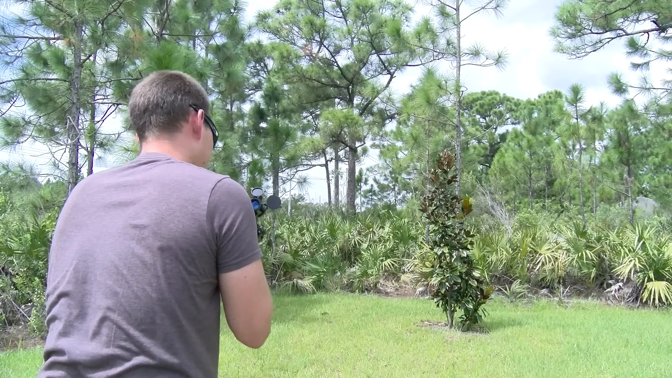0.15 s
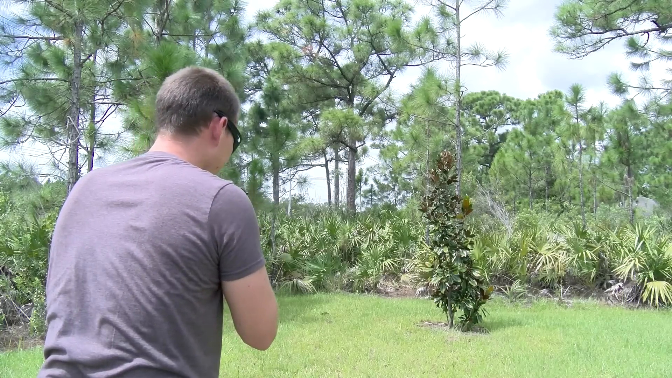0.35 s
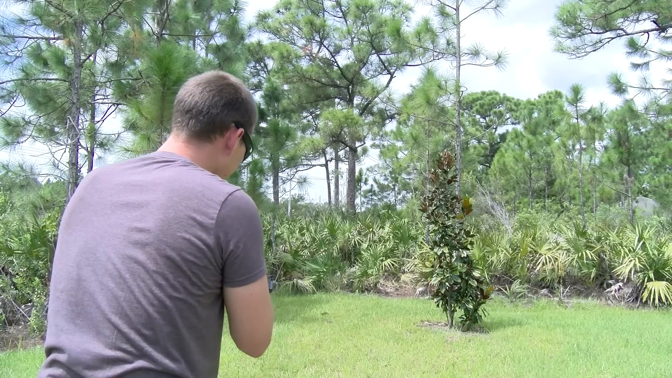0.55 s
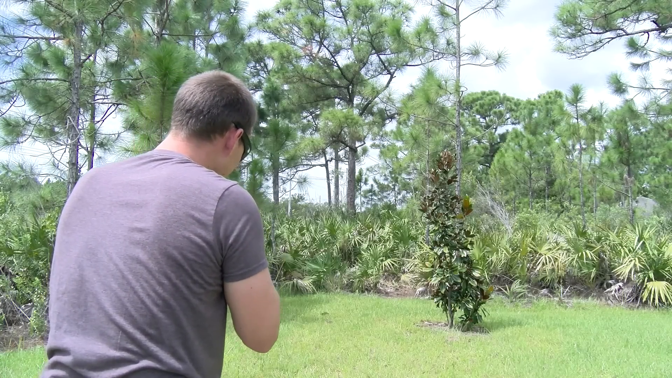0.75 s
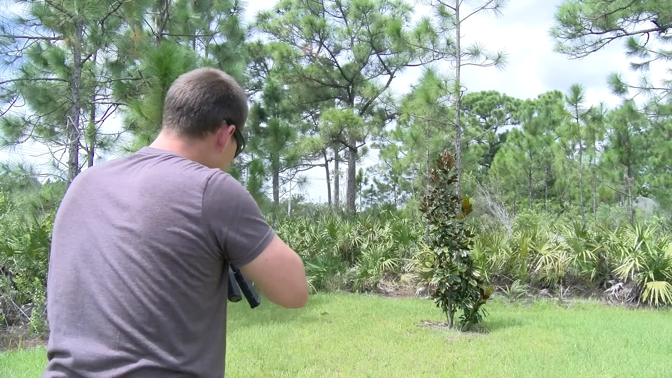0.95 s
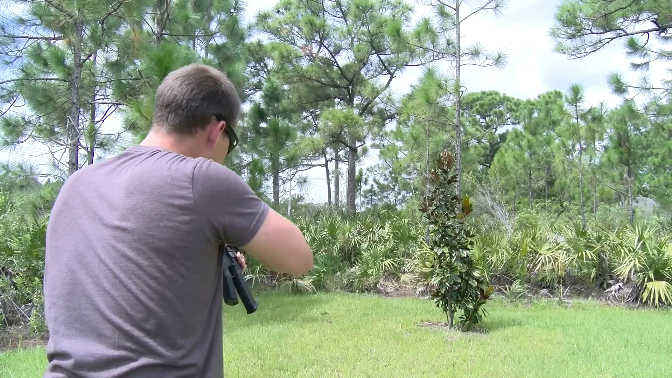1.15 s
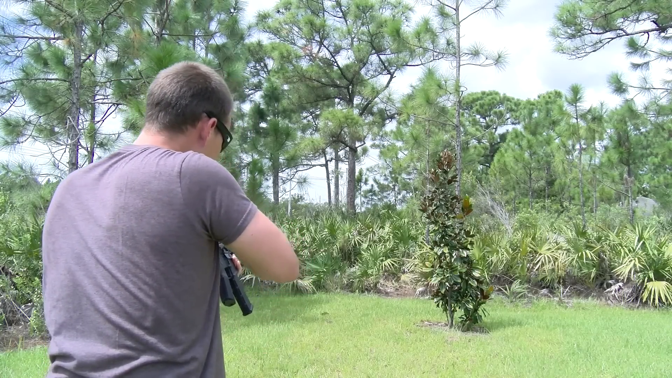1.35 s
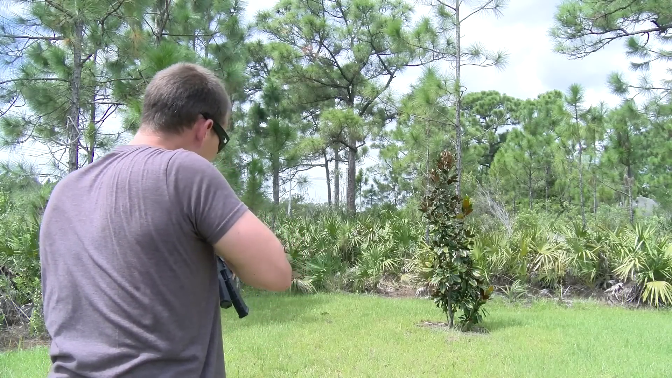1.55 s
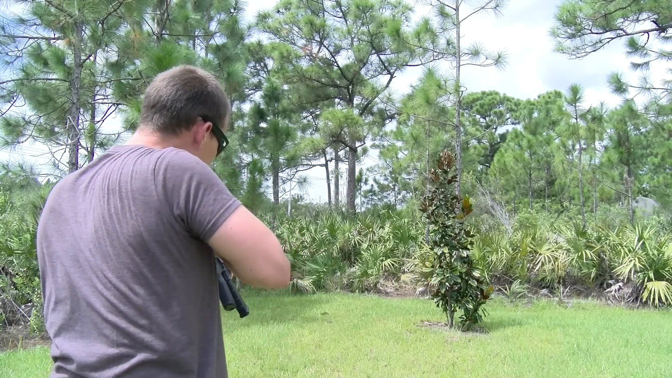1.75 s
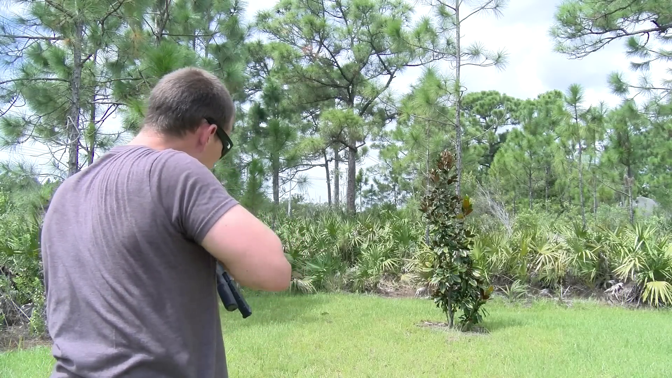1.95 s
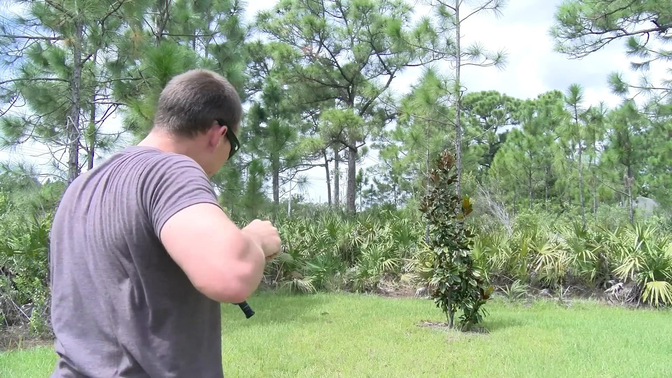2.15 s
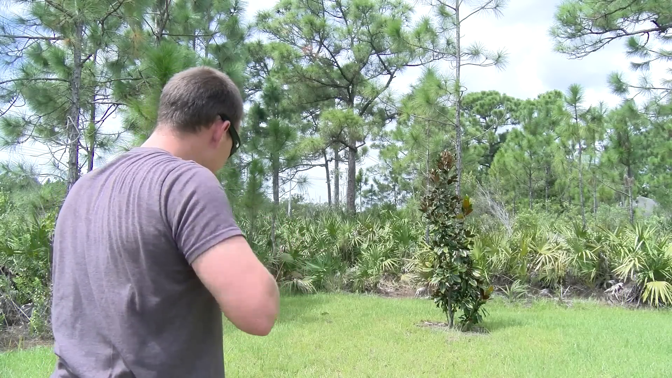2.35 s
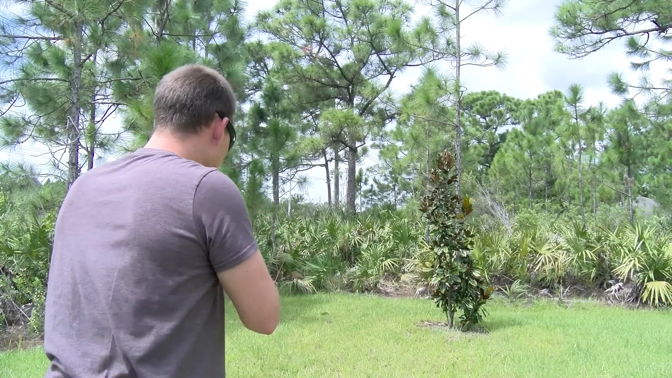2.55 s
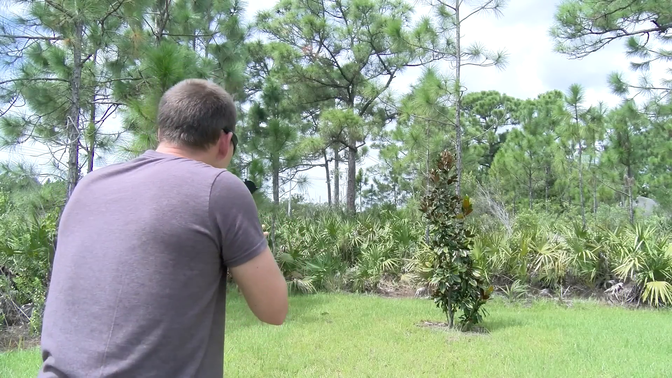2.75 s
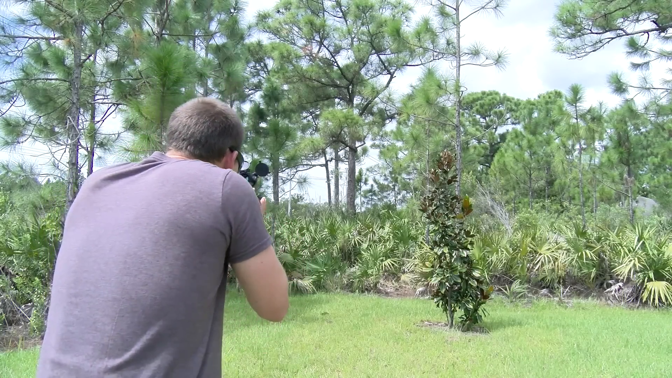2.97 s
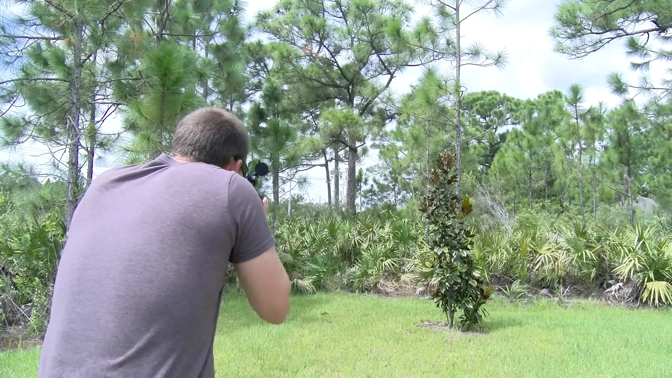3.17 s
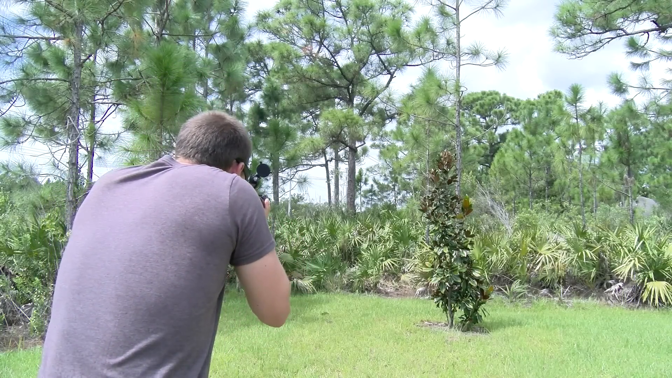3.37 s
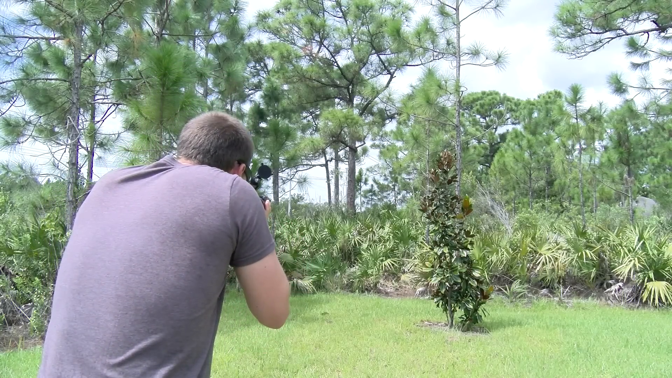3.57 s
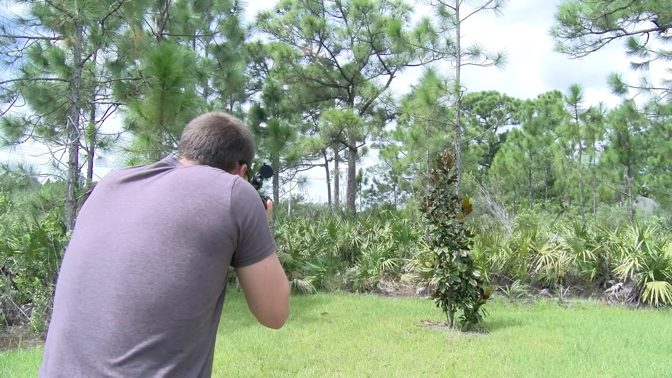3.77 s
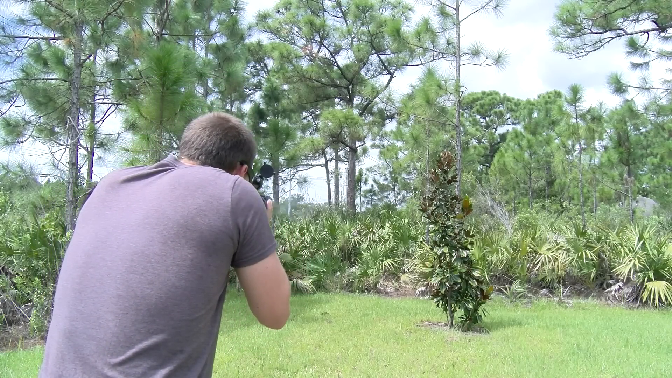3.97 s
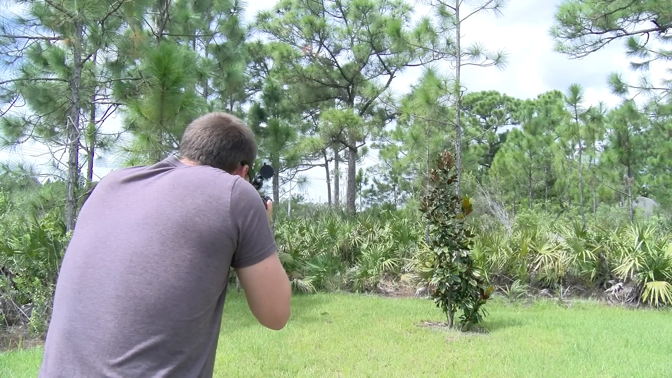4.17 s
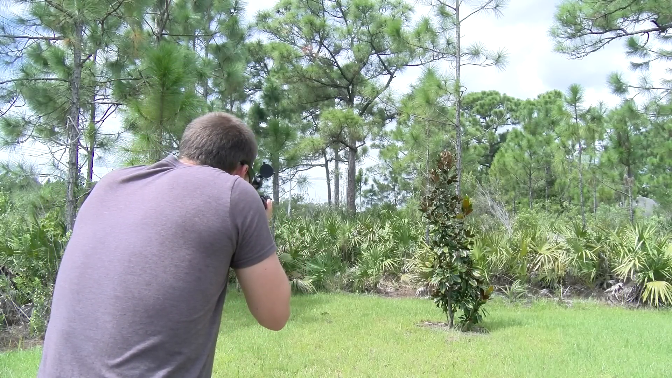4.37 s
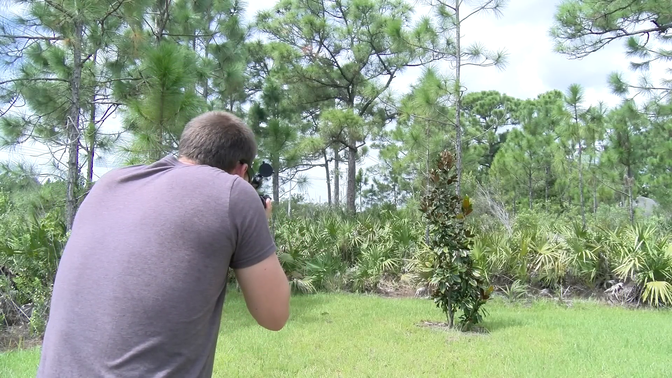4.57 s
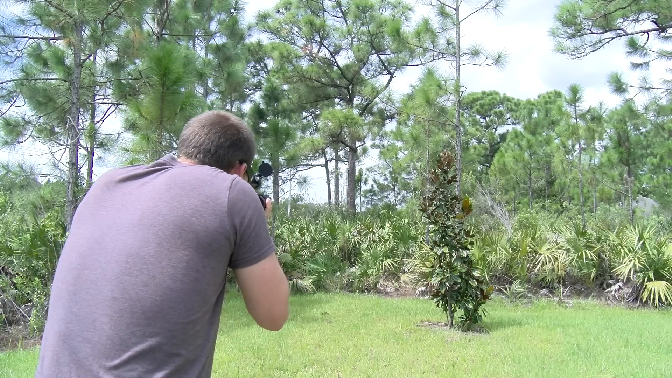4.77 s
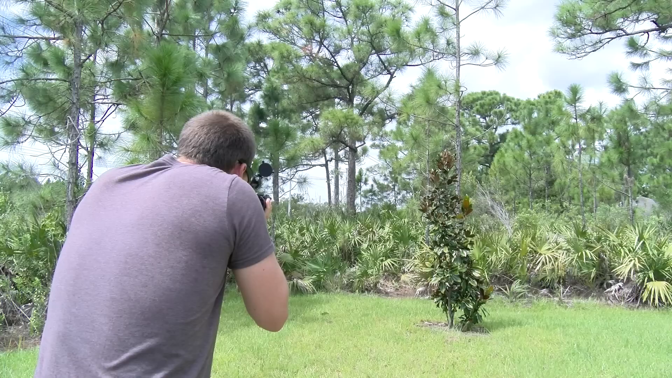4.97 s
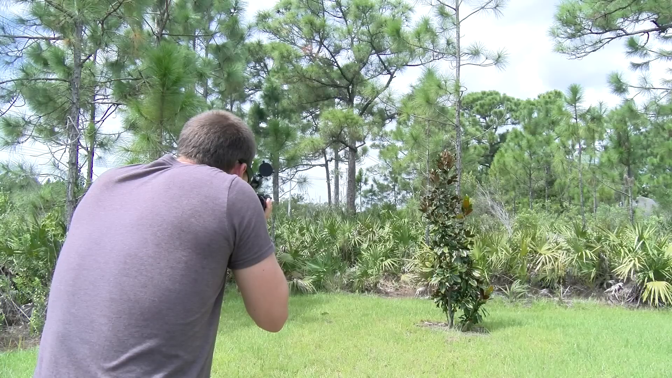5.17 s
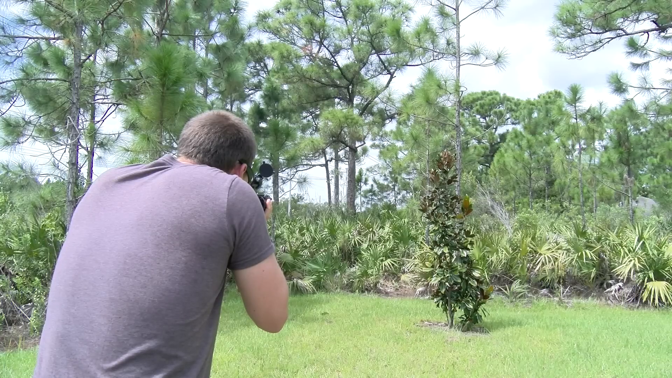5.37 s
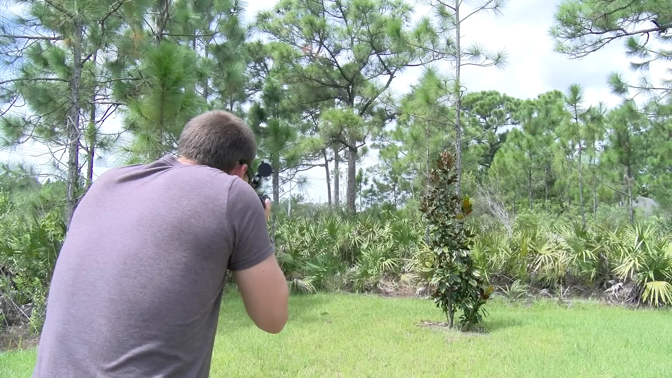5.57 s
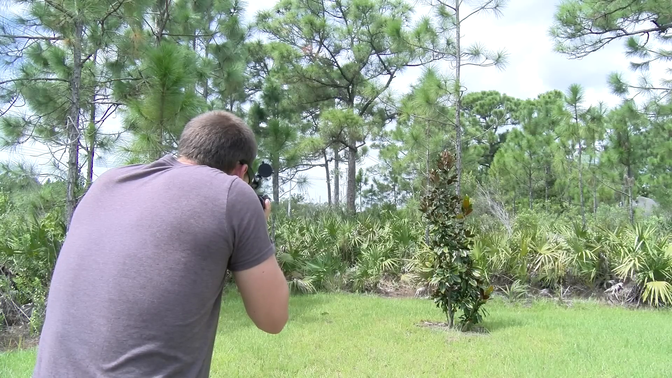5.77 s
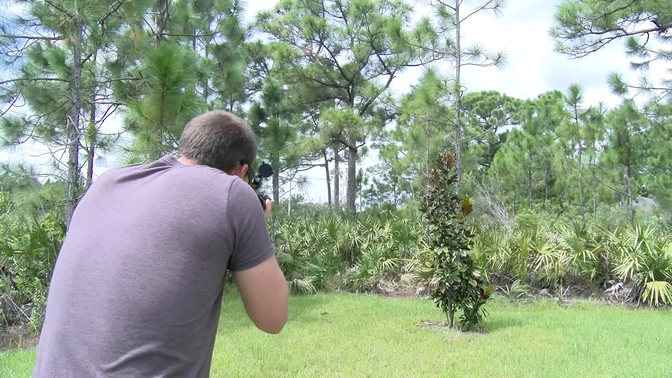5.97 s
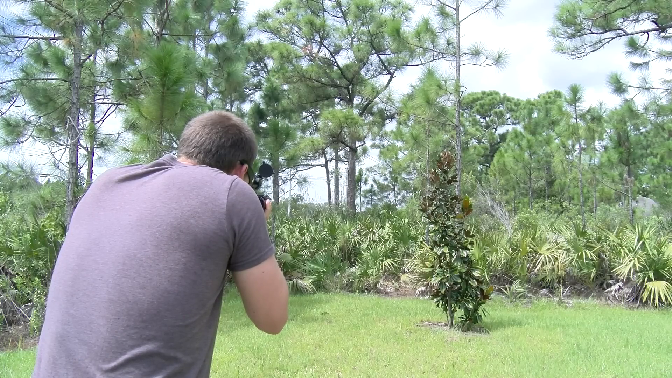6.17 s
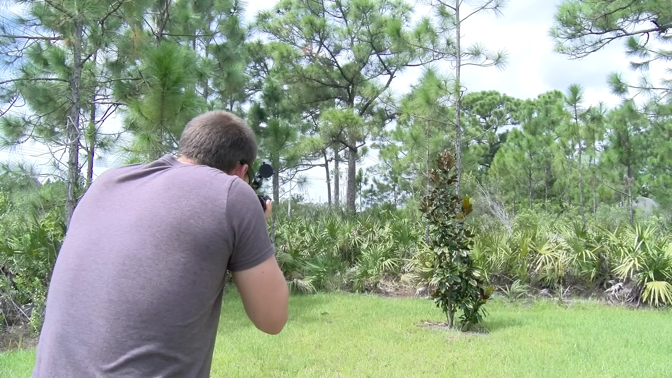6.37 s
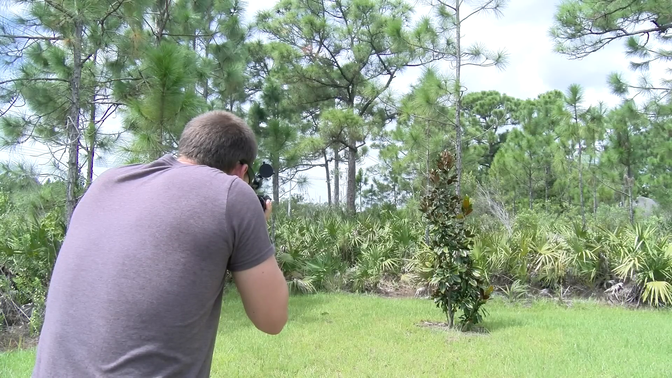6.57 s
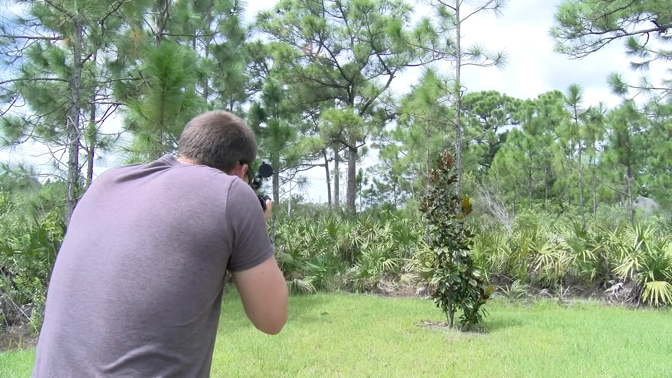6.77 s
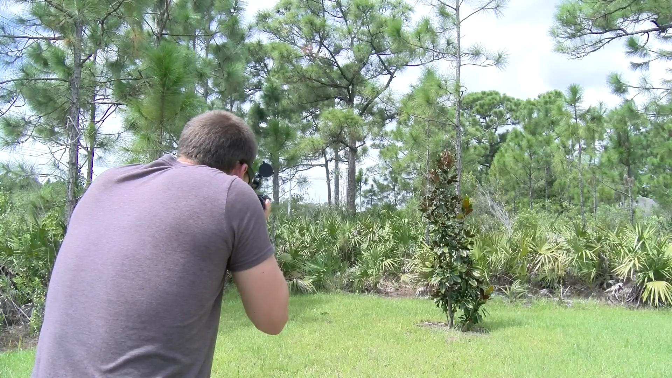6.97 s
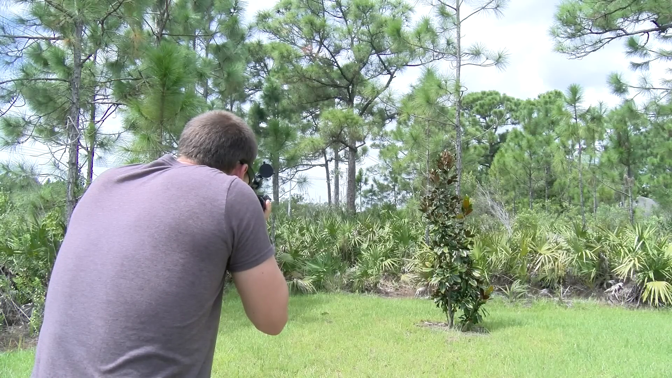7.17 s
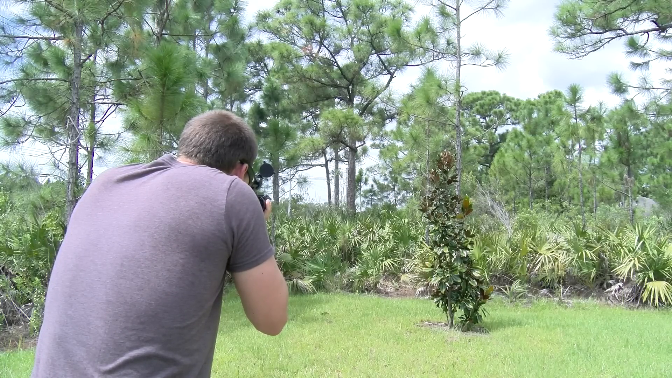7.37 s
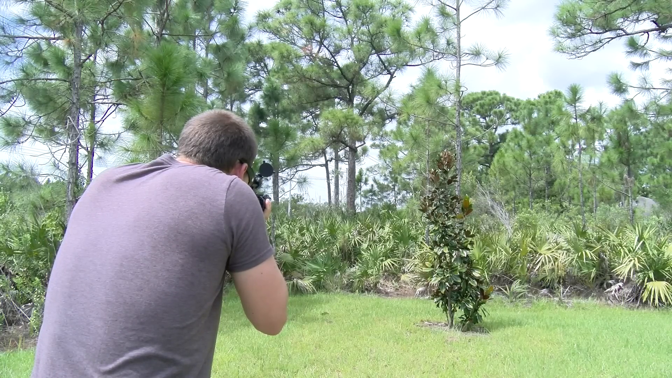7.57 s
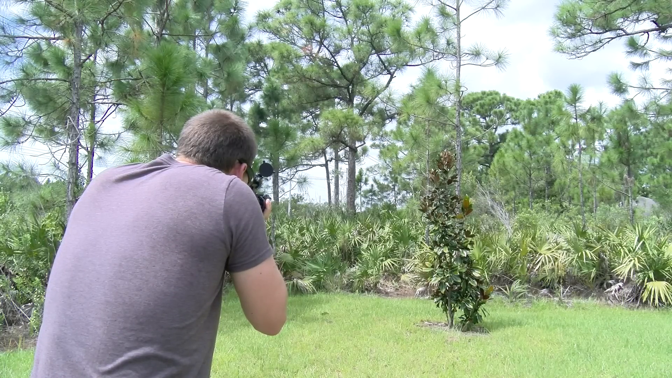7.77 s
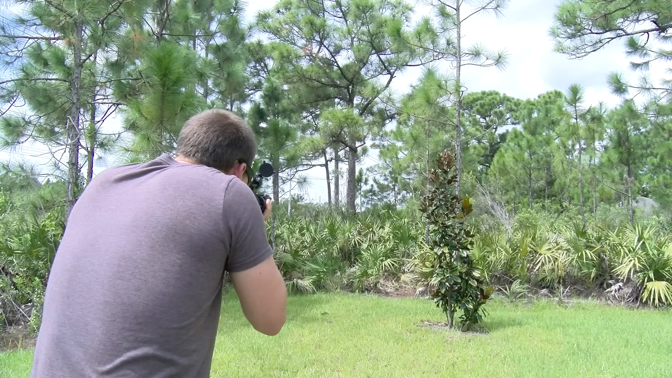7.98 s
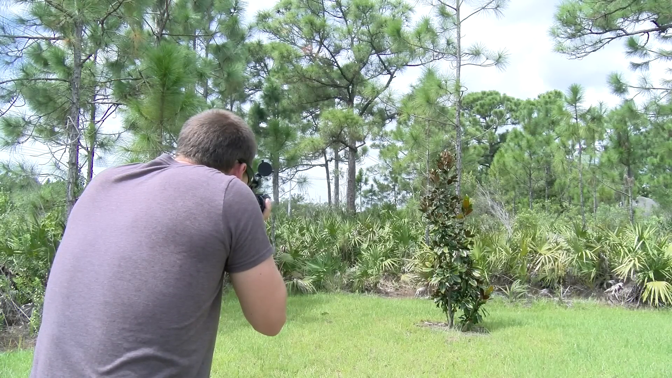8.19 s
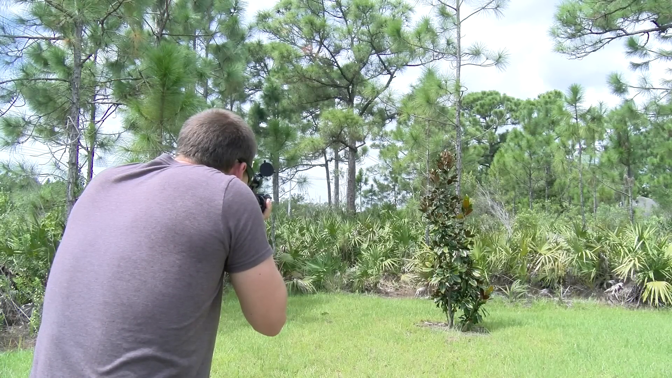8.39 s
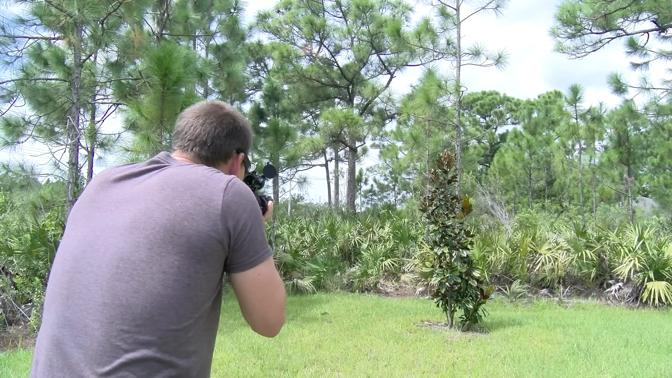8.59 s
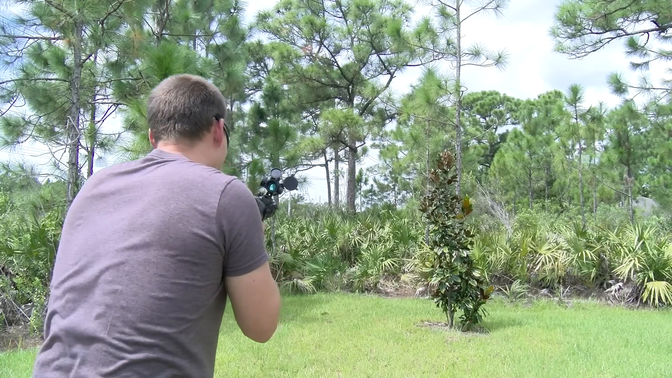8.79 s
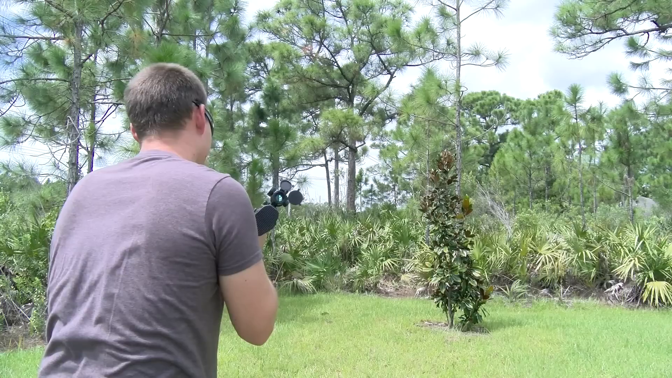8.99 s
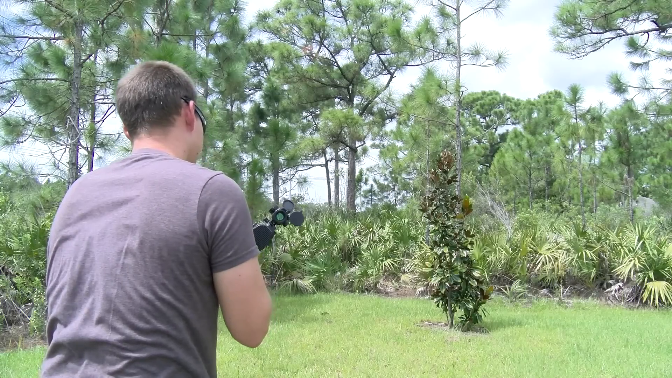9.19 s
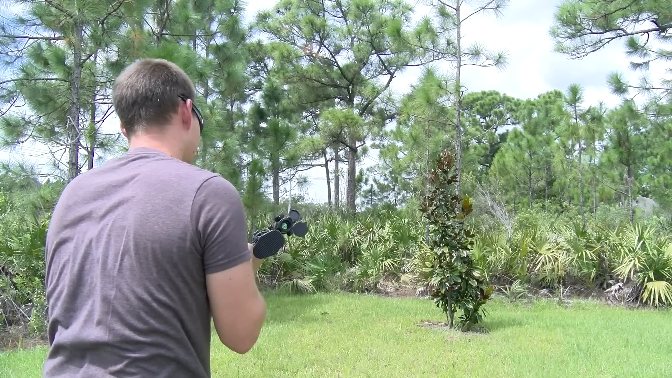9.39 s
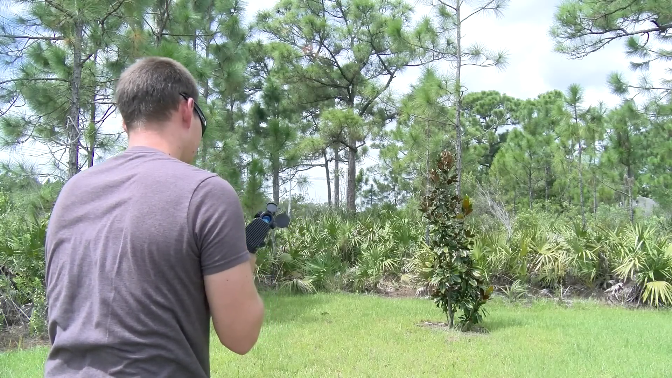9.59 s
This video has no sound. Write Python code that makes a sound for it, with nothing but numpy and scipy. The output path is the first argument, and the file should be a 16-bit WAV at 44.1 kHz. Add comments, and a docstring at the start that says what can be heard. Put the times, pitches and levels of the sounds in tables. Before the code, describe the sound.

Metallic loading clicks, then four evenly paced pops and bolt clacks from an airsoft rifle, with a faint distant engine and insects behind.

```python
"""Airsoft rifle on a pine-edged lawn

A gas blowback rifle, left of the microphone, is loaded, charged and fired four times.
Each shot is a hammer blow, a pop of gas at the muzzle and the bolt slamming back and forward.
Near trunks scatter the sound and the tree line throws the pop back.
Far off, an engine hums, tyres roar on a road and insects sing under a faint, thin whine."""
import sys
import numpy as np
from scipy import signal
from scipy.fft import rfft, irfft, next_fast_len
from scipy.io import wavfile
from scipy.ndimage import map_coordinates

SR = 44100
rng = np.random.default_rng(int(sys.argv[2]) if len(sys.argv) > 2 else 0)


def int16_out(signal):
    """Quantize to a 16-bit WAV file."""
    q = np.round(np.clip(np.atleast_2d(signal).T, -1, 1) * 32767)
    wavfile.write(sys.argv[1], SR, q.astype(np.int16))


N = 425124
AGE_S = np.arange(SR // 4) / SR  # time since a blow

# modes of the hollow stock and barrel: pitch_hz, level_db, t60_s
STOCK_MODES = [(150, -6.5, 0.035), (214, -1, 0.03), (392, -12, 0.16), (573, -5, 0.021), (680, -15, .05),
               (895, -1.5, .05)]
# spectrum of small parts striking: frequency_hz, level_db
TICK_SPECTRUM = [(100, -15.5), (400, -6.5), (1200, -4), (2400, 0.5), (3200, 2.5), (4300, -1), (6400, -2),
                 (8500, -15), (12000, -23), (16000, -28.5)]
# how alike the background is on the microphone's two sides: frequency_hz, correlation
AMBIENT_LIKENESS = [(60, 0.96), (150, 0.71), (380, 0.72), (950, 0.47), (2380, -0.0028), (5980, -0.29),
                    (15000, 0.32)]


def firing():
    """The hammer falls, gas pops from the muzzle and the bolt recoils into its rear stop."""
    # the shots: pop_s, pop_db, hammer_lead_s, hammer_db, hammer_t60_s, recoil_db
    shots = [(3.9503, -8, .0111, -12.5, 0.015, -12.5), (5.518, -5.5, .0136, -15.5, 0.041, -14),
             (6.8251, -5.5, .014, -15.5, 0.037, -10.5), (8.1732, -6, .0131, -15, 0.039, -12)]
    # spectra of a heavy blow, the gas and the tree line's echo: frequency_hz, level_db
    slam_spectrum = [(60, -16), (200, 4), (700, 4.5), (1500, 0), (2300, -5.5), (3000, 4), (4200, -0.5),
                     (6600, -0.5), (8500, -18), (12000, -16), (16000, -24.5)]
    gas_spectrum = [(100, -8), (600, -7.5), (950, -3.5), (2500, 1.5), (5000, -1.5), (7000, -8.5),
                    (9000, -14), (16000, -21.5)]
    tree_line_spectrum = [(150, -2.5), (600, -7.5), (900, 4.5), (1300, -4.5), (3300, -4.5), (7000, -9.5),
                          (16000, -27.5)]
    pop_lead_s, recoil_s, tree_line_s = .001, .0059, .1195
    out = np.zeros((2, N))
    for pop_s, pop_db, hammer_lead_s, hammer_db, hammer_t60, recoil_db in shots:
        strike_s = pop_s - hammer_lead_s
        sear = clatter(TICK_SPECTRUM, t60=.04, alike=.7, spike=.5)
        add(out, strike_s - .003, amp(hammer_db - 18.5) * sear)
        tilt_db = hammer_db + 15.5  # harder is brighter
        impact = clatter(slam_spectrum, hammer_t60, alike=.99, spike=.91, tilt_db=tilt_db)
        hammer = amp(hammer_db) * (impact + amp(-20) * ring(STOCK_MODES, spread=.1))
        add(out, strike_s, hammer, pan_db=1.5)
        add(out, strike_s + .0053, amp(-7) * hammer)  # off the ground
        pop = amp(pop_db) * muzzle_pop(width_s=.00025, lead_s=pop_lead_s)
        add(out, pop_s - pop_lead_s, pop, pan_db=1.45)
        add(out, pop_s - pop_lead_s + .005, amp(-12) * pop)  # off the ground
        gas = clatter(gas_spectrum, t60=.067, alike=1, spike=.99)
        add(out, pop_s + .0004, amp(pop_db - 11.5) * gas, pan_db=3)
        # the muzzle points at the tree line, which throws the pop back
        echo = clatter(tree_line_spectrum, t60=.019, alike=.4, spike=.3)
        add(out, pop_s + tree_line_s, amp(pop_db - 27.5) * echo)
        rear_stop = clatter(slam_spectrum, t60=.029, alike=.79, spike=.2)
        rear_stop += amp(-10.5) * receiver(spread=.77) + amp(-18) * ring(STOCK_MODES, spread=.1)
        add(out, pop_s + recoil_s, amp(recoil_db) * rear_stop, pan_db=-1)
    return out


def muzzle_pop(width_s, lead_s):
    """A smooth pulse of gas, followed by a slow swing back and the barrel's hoot."""
    # resonances of stock and barrel: pitch_hz, width_hz, level_db
    resonances = [(159, 73, -3), (227, 48, 1.5), (626, 23, -12), (966, 100, 13)]
    swing_hz = 130
    pulse = -np.exp(-.5 * ((AGE_S - lead_s) / width_s) ** 2)
    swing = lambda f: -f * f / (swing_hz ** 2 - f * f + 1.2j * f * swing_hz)
    hoot = lambda f: sum(amp(db) * 1j * f * width / (hz * hz - f * f + 1j * f * width)
                         for hz, width, db in resonances)
    return filtered(pulse, lambda f: swing(f) + hoot(f))


def bolt():
    """The spring drives the bolt home: a first contact, then the lock that rings the receiver."""
    # the bolt closing: lock_s, lock_db, contact_lead_s, contact_db, tilt_db_per_octave
    closings = [(2.0256, -16.5, .0048, -19.5, .5), (3.991, -19.5, .0079, -24, -2),
                (5.5563, -22.5, .0039, -22.5, -1), (6.8619, -17.5, .0092, -26.5, -2.5),
                (8.2066, -13, .004, -32, 1.5)]
    out = np.zeros((2, N))
    for lock_s, lock_db, lead_s, contact_db, tilt_db in closings:
        contact = clatter(TICK_SPECTRUM, t60=.025, alike=.2, spike=.48, tilt_db=tilt_db + .5)
        contact += amp(-12) * receiver(spread=.6)
        add(out, lock_s - lead_s, amp(contact_db) * contact)
        lock = clatter(TICK_SPECTRUM, t60=.05, alike=.2, spike=.28, tilt_db=tilt_db)
        lock += amp(-8.5) * receiver(spread=.6) + amp(-23.5) * ring(STOCK_MODES, spread=.1)
        add(out, lock_s, amp(lock_db) * lock, pan_db=-2.7)
    return out


def receiver(spread):
    """The metal body rings, cut short by the shooter's grip."""
    # modes of the receiver and buffer tube before the grip damps them: pitch_hz, level_db, t60_s
    metal_modes = [(867, -17.5, .06), (1340, -12.5, 0.055), (1660, -5.5, 0.054), (1800, -2, .04),
                   (1810, 2.5, 0.077), (1950, -4.5, 0.02), (2252, -9.5, 0.16), (2800, -6.5, .04),
                   (3230, -11.5, .05), (3410, -3.5, 0.05), (3920, -10, 0.056), (4970, -17.5, 0.042),
                   (6350, -15, .05)]
    return ring(metal_modes, spread) * fade(t60=.06)


def handling():
    """Parts click into place; while they slide, they give runs of faint ticks."""
    # magazine, charging handle and trigger reset:
    # start_s, level_db, t60_s, tilt_db_per_octave, pitch_hz, ring_db
    clicks = [(.04, -35, 0.027, -7, 3950, -12), (1.408, -26.5, 0.038, -1, 2670, 1.5),
              (1.478, -33, 0.036, 2, 3600, -10), (1.541, -40, 0.037, -3, 3380, -5),
              (1.569, -41.5, 0.08, -3, 1210, 1.5), (1.9647, -34.5, 0.04, 9, 1860, 8),
              (4.2146, -31.5, 0.019, 2.5, 5900, -12.5), (4.6074, -39.5, 0.0224, -4, 2870, -7.5),
              (6.145, -42, 0.028, 1, 5050, -12), (7.4546, -46.5, 0.026, 5, 4530, -5),
              (9.0895, -37.5, 0.044, -2.5, 2506, -11.5)]
    # sliding parts: start_s, end_s, level_db, pitch_hz, ring_db
    slides = [(1.441, 1.475, -47, 2250, -5), (1.522, 1.53, -49.5, 3140, -10), (1.989, 2.018, -43, 1840, -5),
              (4.32, 4.32, -53.5, 4000, -12), (4.543, 4.55, -57, 4650, 1)]
    gap_s, jitter_s, scatter_db = .0115, .001, .5
    out = np.zeros((2, N))
    for start_s, db, t60, tilt_db, hz, ring_db in clicks:
        add(out, start_s, amp(db) * click(t60, tilt_db, hz, ring_db), pan_db=.1)
    for start_s, end_s, db, hz, ring_db in slides:
        for tick_s in np.arange(start_s, end_s, gap_s):
            late, softer = rng.standard_normal(2)
            tick = click(t60=.051, tilt_db=5, hz=hz, ring_db=ring_db)
            add(out, tick_s + jitter_s * late, amp(db - scatter_db * softer) * tick, pan_db=-4.5)
    return out


def click(t60, tilt_db, hz, ring_db):
    """A small part snaps and rings in a cluster of modes, damped by the hand."""
    part = ring([(hz, 0, .032), (1.09 * hz, -6, .022), (.73 * hz, -9, .02)], spread=.4)
    return clatter(TICK_SPECTRUM, t60, alike=.76, spike=.5, tilt_db=tilt_db) + amp(ring_db) * part


def clatter(spectrum, t60, alike, spike, tilt_db=0):
    """A hard onset, then a dense rattle dying away; long waves reach left and right alike."""
    knee_hz = 9150  # the tilt, in dB per octave, levels off above this
    colour = lambda hz: along(spectrum, hz) + tilt_db * np.log2((hz + 43) / (hz + knee_hz))
    likeness = lambda hz: alike + (1 - alike) / (1 + (hz / 1100) ** 2)
    return noise(colour, likeness, len(AGE_S)) * (fade(t60) + spike * fade(.003))


def ring(modes, spread):
    """Each blow rings the modes at new strengths; each reaches left and right at its own phase."""
    hz, db, t60 = np.transpose(modes)[:, :, None]
    uneven_db, detune, skew = rng.standard_normal((3, len(modes), 1))
    envelopes = amp(db + uneven_db) * fade(t60)
    phase = 2 * np.pi * hz * (1 + .012 * detune) * AGE_S
    return np.array([-(envelopes * np.sin(phase + side * spread * skew)).sum(0) for side in (-1, 1)])


def from_left(gun):
    """The microphone's right side hears the rifle later and with less treble."""
    lag_s, shade_db = 2.2e-5, 3.5
    side = np.array([[1], [-1]])
    delay = lambda hz: np.exp(1j * np.pi * hz * lag_s * side)
    shade = lambda hz: amp(side * shade_db * hz / (hz + 9000))
    return filtered(gun, lambda hz: delay(hz) * shade(hz))


def pines(gun):
    """Trunks and brush scatter a soft tail that swells after the blow, with a few distinct echoes."""
    # decay among the trees: frequency_hz, t60_s
    decay_times = [(100, 0.19), (600, 0.3), (1800, 0.38), (4000, 0.38), (8000, .32), (15000, 0.12)]
    # colour of the scattered tail: frequency_hz, gain_db
    scatter_spectrum = [(80, -4.5), (250, -9.5), (600, -9), (1250, 1), (1780, 4), (2300, -0.5), (2800, -4),
                        (3350, 0), (3900, -4.5), (5000, -3.5), (6400, -1.5), (9000, 9), (15000, 8.5)]
    # echoes off near trunks: delay_s, relative_db, t60_s, tilt_db_per_octave
    trunk_echoes = [(0.034, -15, .012, 0.5), (0.045, -15, 0.015, -1.5), (.056, -16, .02, 2),
                    (.081, -19.5, 0.013, 1)]
    echo_spectrum = [(100, -9), (900, -2.5), (7000, -1), (16000, -4.5)]  # frequency_hz, level_db
    likeness = [(150, .8), (700, .1), (2000, -.4), (8000, 0)]  # frequency_hz, correlation
    mono, out = gun.mean(0), np.zeros((2, N))
    for stretch in np.array_split(np.arange(N), 8):  # each has its own random tail
        hiss = noise(lambda hz: 0 * hz, lambda hz: along(likeness, hz), SR * 3 // 4)
        hz, t, bands = signal.stft(hiss, SR, nperseg=256)
        swell = 1 - np.exp(-(t / .026) ** 3)
        decay = np.exp(-np.log(1000) * t / along(decay_times, hz)[:, None])
        tail = signal.istft(bands * swell * decay, SR, nperseg=256)[1]
        tail = filtered(tail / np.linalg.norm(tail[0]), lambda hz: amp(along(scatter_spectrum, hz)))
        for delay_s, db, t60, tilt_db in trunk_echoes:
            echo = clatter(echo_spectrum, t60, alike=0, spike=.92, tilt_db=tilt_db)
            add(tail, delay_s, amp(db + 9) * echo / np.linalg.norm(echo[0]))
        scattered = signal.fftconvolve(mono[stretch][None], tail, axes=1)
        add(out, stretch[0] / SR, amp(-13.5) * scattered, pan_db=-1.5)
    return out


def engine():
    """A far engine: its rumble and its wavering hum rise and fall together."""
    # the engine's rise and fall: time_s, relative_db
    levels = [(0.0, -50.5), (0.32, -51.5), (3.44, -51.5), (3.92, -49.5), (4.45, -52), (5.58, -50),
              (5.88, -53), (6.5, -49), (9.64, -51)]
    # its rumble and the tones of its hum: frequency_hz, level_db
    rumble_spectrum = [(12, -31), (20, -4.5), (80, 0.5), (129, -8), (152, -12), (189, -9), (214, -18.5),
                       (236, -14.5), (264, -23.5), (289, -20.5), (400, -27), (520, -53.5), (880, -120)]
    hum_tones = [(73, -57.5), (124, -63), (186, -65.5)]
    level_db = curve(levels)
    out = amp(level_db + .96 + .8 * wobble(6)) * ambience(rumble_spectrum)
    for hz, db in hum_tones:
        phase = 2 * np.pi * np.cumsum(hz * (1 + .01003 * wobble(2.7))) / SR
        tone_db = db + level_db - level_db.mean() + .85 * wobble(1.6)
        out += amp(tone_db) * np.sqrt(2) * np.sin(phase)
    return out


def traffic():
    """A far road, with a tyre roar as single vehicles pass."""
    # the road's rise and fall: time_s, relative_db
    levels = [(0.0, -59.5), (0.59, -58.5), (1.1, -59), (4.0, -59.5), (4.24, -62), (5.29, -61.5),
              (5.98, -57), (6.44, -58.5), (7.89, -57.5), (8.16, -55), (8.46, -58), (9.64, -58.5)]
    # the road from a distance: frequency_hz, level_db
    road_spectrum = [(150, -32.5), (250, -10), (263, -12), (289, -3.5), (314, -11), (434, -4), (657, -0.5),
                     (966, -5.5), (1460, -19), (3000, -30), (3900, -55.5), (6600, -120)]
    # swells of tyre noise: start_s, end_s, pitch_hz, level_db
    passes = [(0.423, 0.664, 714, -55), (2.3, 2.55, 654, -62), (3.25, 3.45, 950, -63),
              (5.797, 6.158, 596, -56)]
    road = amp(curve(levels) + 1.27 + .67 * wobble(6.1)) * ambience(road_spectrum)
    tyres = sum(amp(db) * narrow_band(start, end, hz, width_hz=260) for start, end, hz, db in passes)
    return road + tyres


def insects():
    """Many far insects, each on its own narrow pitch, settle to a steady chorus; a few sing alone."""
    # the chorus: frequency_hz, level_db
    chorus_spectrum = [(1180, -24.5), (2000, -3.5), (2500, -5), (2610, -4.5), (3540, -2), (4530, 0),
                       (5900, 0.5), (6960, -2.5), (8140, -5), (13900, -18.5), (14400, -19)]
    # single insects: start_s, end_s, pitch_hz, width_hz, relative_db
    songs = [(0, .2, 4060, 130, -71), (.3, 1.25, 4450, 320, -73.5), (.85, 1.25, 4220, 220, -71.5),
             (.9, 1.15, 6420, 350, -73), (.8, 1.3, 8100, 300, -78), (1.3, 3.2, 8700, 1400, -77),
             (6.35, 7.1, 7930, 180, -80), (7.6, 8.75, 7920, 180, -78.5)]
    pitches_hz = np.arange(0, SR // 2, 22)
    voices_db = 2.1 * rng.standard_normal(len(pitches_hz))
    colour = lambda hz: along(chorus_spectrum, hz) + np.interp(hz, pitches_hz, voices_db)
    chorus = noise(colour, lambda hz: along(AMBIENT_LIKENESS, hz), N)
    chorus_db = curve([(0, -62), (2.8, -64)])
    singles = sum(amp(db + 2.5) * narrow_band(start, end, hz, width_hz)
                  for start, end, hz, width_hz, db in songs)
    return amp(chorus_db) * chorus + singles


def whine():
    """A very faint, thin whine high above the insects."""
    return amp(-89) * narrow_band(0, N / SR, hz=14780, width_hz=160)


def ambience(spectrum):
    """Steady noise from all round the lawn."""
    return noise(lambda hz: along(spectrum, hz), lambda hz: along(AMBIENT_LIKENESS, hz), N)


def narrow_band(start_s, end_s, hz, width_hz):
    """A narrow band of noise that fades in, holds and fades out."""
    swell = curve([(start_s - .25, 0), (start_s + .1, 1), (end_s - .1, 1), (end_s + .25, 0)])
    colour = lambda f: -20 * np.log10(1 + (2 * (f - hz) / width_hz) ** 4)
    return swell * noise(colour, lambda f: .2, N)


def noise(colour, alike, size):
    """Stereo noise of rms 1; colour (dB) and left-right likeness are functions of frequency."""
    angle = lambda hz: np.arccos(np.clip(alike(hz) + 0 * hz, -1, 1)) / 2
    response = lambda hz: amp(colour(hz)) * [np.cos(angle(hz)), np.sin(angle(hz))]
    mid, side = filtered(rng.standard_normal((2, size)), response)
    stereo = np.array([mid + side, mid - side])
    return stereo / np.sqrt(np.mean(stereo ** 2) + 1e-20)


def filtered(x, response):
    """Pass x through a frequency response."""
    n = x.shape[-1]
    padded = next_fast_len(n + SR // 10)
    return irfft(rfft(x, padded) * response(np.fft.rfftfreq(padded, 1 / SR)), padded)[..., :n]


def amp(db):
    """Decibels to gain."""
    return 10 ** (np.asarray(db) / 20)


def along(points, hz):
    """Join (frequency_hz, value) points on a log frequency axis."""
    knots_hz, values = np.transpose(points)
    return np.interp(np.log(hz + 1), np.log(knots_hz + 1), values)


def curve(points):
    """Join (time_s, value) points with straight lines, one value per sample."""
    return np.interp(np.arange(N) / SR, *np.transpose(points))


def wobble(rate):
    """A smooth random curve, rate knots a second."""
    return map_coordinates(rng.standard_normal(N // 100), [np.arange(N) * rate / SR], mode="wrap")


def fade(t60):
    """A decay of 60 dB in t60 seconds."""
    return np.exp(-np.log(1000) * AGE_S / t60)


def add(track, start_s, sound, pan_db=0):
    """Mix a sound into the track; positive pan_db is to the left."""
    part = track[:, max(round(start_s * SR), 0):][:, :sound.shape[-1]]
    part += (sound * amp([[pan_db / 2], [-pan_db / 2]]))[:, :part.shape[1]]


def scene():
    """The rifle, its echoes among the pines and the distant background."""
    blows, clicks = firing() + bolt(), handling()
    shielded = amp(-1) * clicks  # the shooter's body shields the small clicks from the trees
    rifle = from_left(blows + clicks) + pines(blows + shielded)
    return rifle + engine() + traffic() + insects() + whine()


def record(dry):
    """The recorder rounds off the highest peaks and keeps nothing above its band limit."""
    top_hz = 15950
    rounded = dry / (1 + np.abs(dry) ** 6) ** (1 / 6)
    return filtered(rounded, lambda hz: hz < top_hz)


dry = scene()
out = record(dry)
int16_out(out)
```